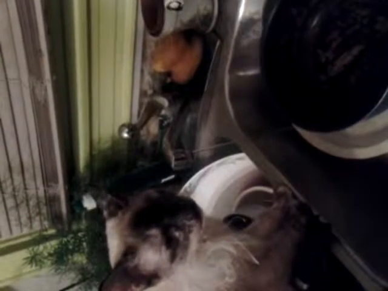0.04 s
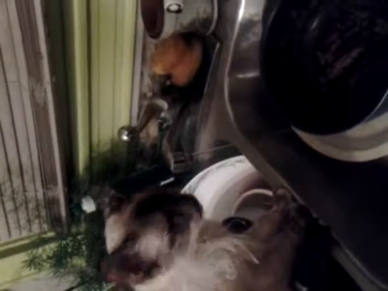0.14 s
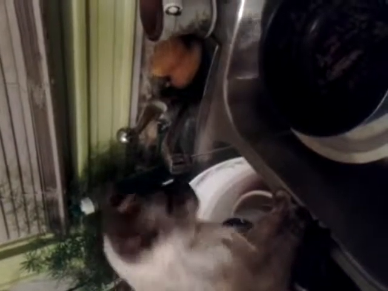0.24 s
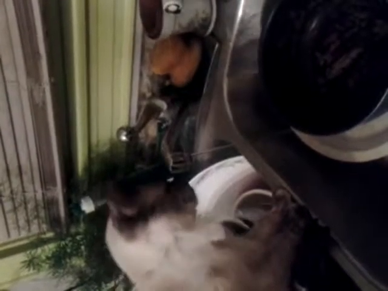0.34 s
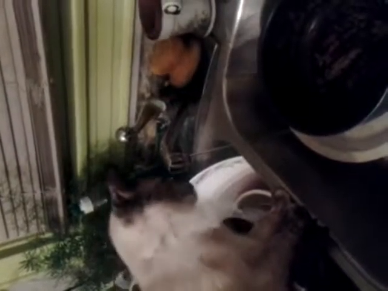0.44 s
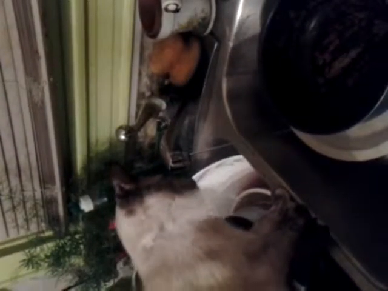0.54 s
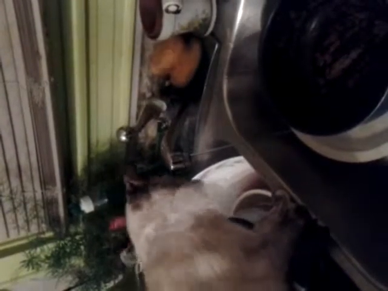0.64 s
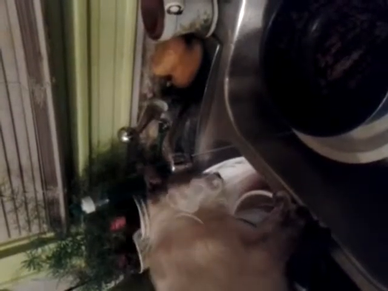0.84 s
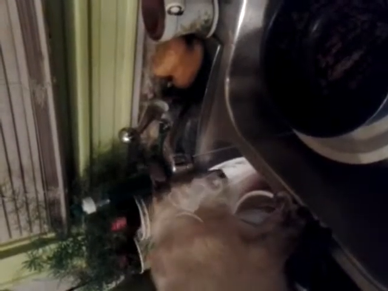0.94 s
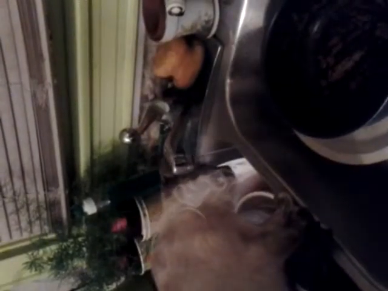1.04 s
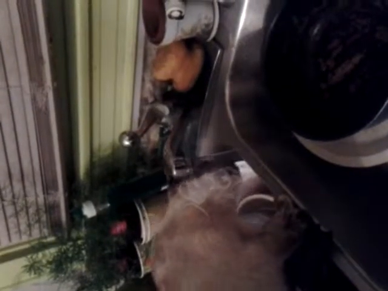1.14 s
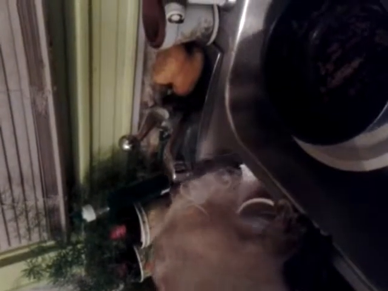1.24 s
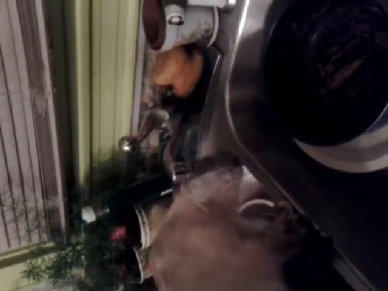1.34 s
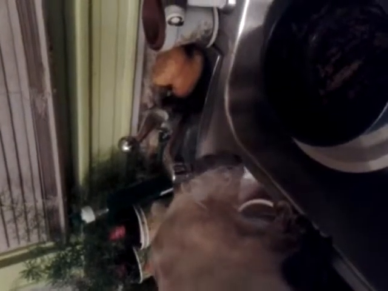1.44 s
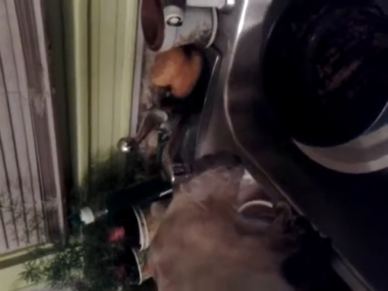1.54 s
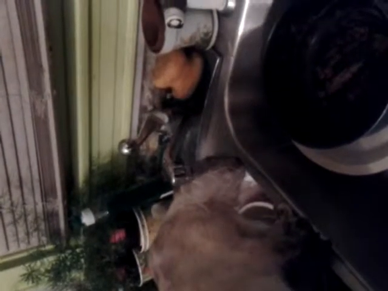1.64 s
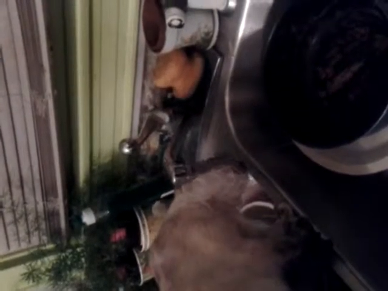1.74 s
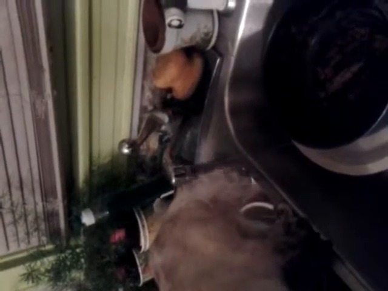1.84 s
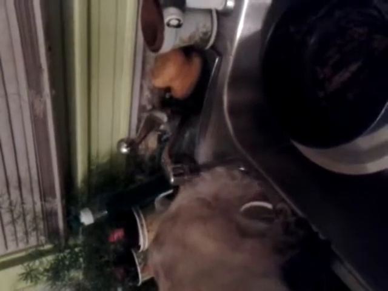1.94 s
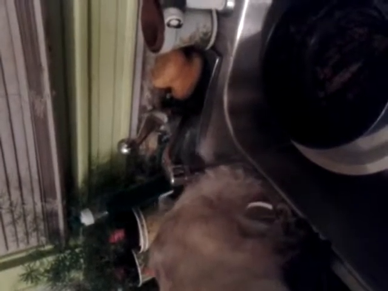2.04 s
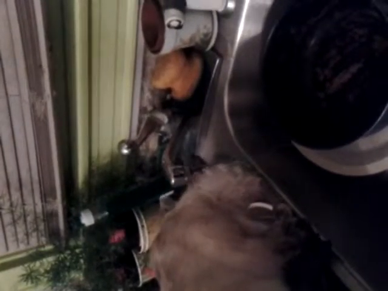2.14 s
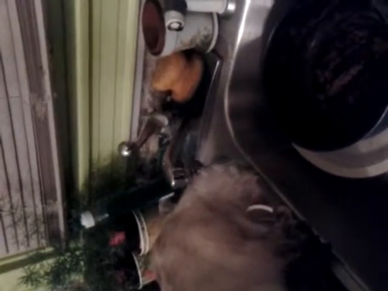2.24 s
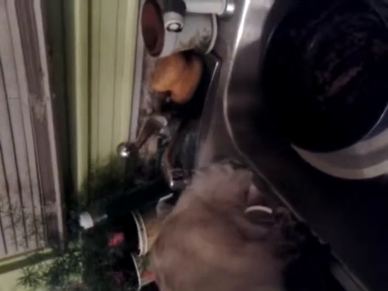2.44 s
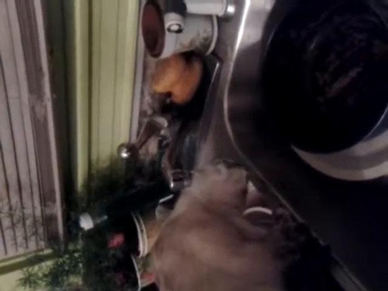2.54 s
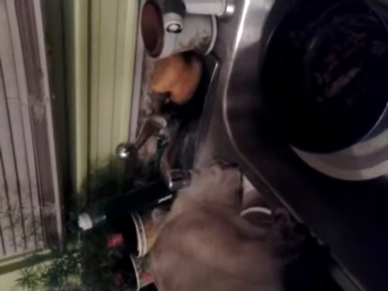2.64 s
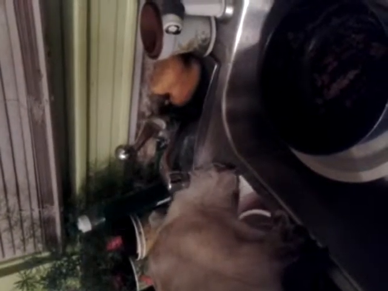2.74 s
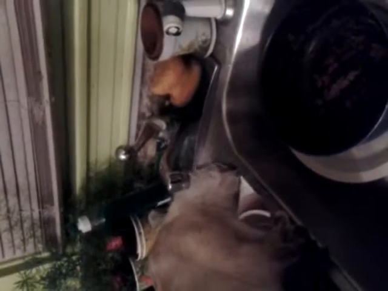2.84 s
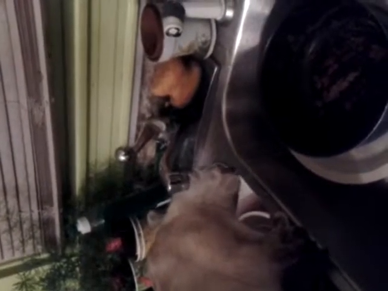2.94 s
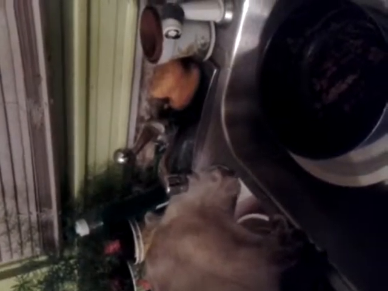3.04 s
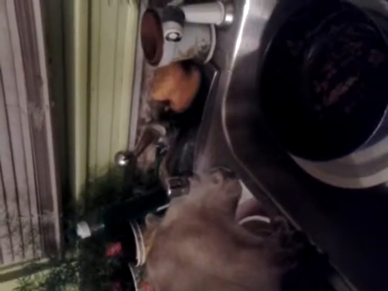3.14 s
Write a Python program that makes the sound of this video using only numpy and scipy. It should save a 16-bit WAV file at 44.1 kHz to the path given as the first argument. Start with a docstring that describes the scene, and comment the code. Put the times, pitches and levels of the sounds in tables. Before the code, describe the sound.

Four dry ticks, then close quiet cat lapping in a steel basin, tiny bubbles snapping sharply, ending on one very loud click.

```python
"""Four dry ticks on the right open the scene while a cat laps water in a steel kitchen sink, close by.
Tiny bubbles snap as short sine rings in noise spray, and bigger bubbles ring lower and uneven.
Each lap is a soft sine gulp with noise churn ringing the air of the basin; filtered drops fizz and swish.
Basin walls and kitchen echo the bubbles by decaying noise, over shaped room rumble, hiss and sine hum."""
import sys
import numpy as np
from scipy import signal
from scipy.fft import rfft, irfft
from scipy.io import wavfile
from scipy.ndimage import uniform_filter1d

SR = 44100
rng = np.random.default_rng(int(sys.argv[2]) if len(sys.argv) > 2 else 0)


def ratio(d):
    """dB to gain"""
    e = np.asarray(d, float) / 20
    return 10 ** e


def master_out(mix):
    """Clip the mix to full scale and print it as 16-bit PCM to the path in sys.argv[1]."""
    frames = np.transpose(np.atleast_2d(mix))
    ceiling = np.clip(frames, -1, 1)
    pcm = np.round(ceiling * 32767).astype(np.int16)
    wavfile.write(sys.argv[1], SR, pcm)


N = 333837

# small snapping bubbles: start_s, level_db (ring peak), pitch_hz (at the start),
# pan_db (left minus right), air_db (spray at 9-14.5 kHz)
SNAP_EVENTS = [(0.0307, -42, 7300, 2, -74.3), (0.7762, -34.5, 7770, 6, -66.0),
               (1.6632, -34, 7580, 6, -52.9), (1.6676, -27.5, 10370, -3, -46),
               (1.7951, -31.5, 7860, 4, -63.4), (1.8, -30.5, 8270, 6, -58.9), (2.2342, -24.1, 7700, 5, -63),
               (2.4289, -38.5, 8480, 4, -66.1), (2.6073, -25.2, 8520, 5, -54),
               (2.8164, -41, 8510, 7, -70.6), (2.8368, -44, 13090, 2, -53),
               (2.9658, -33.5, 6900, -2, -49.1), (3.0573, -24.8, 8480, 3, -37),
               (3.2303, -31.0, 10190, -2, -42), (3.5485, -43.4, 6980, 0, -56.8),
               (3.5557, -39, 7620, 1, -70.7), (3.6493, -23, 7500, 0, -33), (3.6516, -24, 8100, 5, -34),
               (3.6804, -22, 9740, 0, -37), (3.7829, -27.5, 7700, 2, -63.6), (3.8136, -33, 14040, 0, -44),
               (3.8894, -41.5, 7750, 5, -65.5), (3.9379, -44, 7900, 4, -69.2),
               (3.9452, -27.5, 7400, -3, -74.3), (3.9965, -20.5, 7670, 6, -57),
               (4.0043, -34, 9300, -3, -54.1), (4.7813, -36.8, 8760, 8, -63.2),
               (4.7889, -26.5, 7200, 2, -55.4), (4.8997, -34, 7400, -4, -47.4),
               (4.9036, -19, 7950, 5, -50.8), (4.9287, -22, 7900, 13, -51.9),
               (4.9459, -31.8, 5970, -1, -47.9), (4.9725, -38.8, 7560, 3, -61.0),
               (4.9818, -31.5, 7440, 1, -50.8), (5.0232, -43.7, 10210, 2, -62.1),
               (5.4689, -39, 7260, 0, -56.4), (5.6282, -27.5, 7770, 2, -44),
               (5.6636, -33.5, 7650, 4, -48.1), (5.7319, -20.9, 8100, 4, -34),
               (5.8267, -37.4, 7100, 0, -53.5), (5.8425, -33.6, 7150, 3, -59.9),
               (5.8493, -27.5, 7080, 0, -63.2), (5.9837, -35, 13590, 1, -44), (6.0181, -20.5, 7470, 4, -32),
               (6.0894, -27.5, 10400, 0, -38.4), (6.1866, -38, 7340, 2, -58.8),
               (6.2043, -24.5, 8300, 3, -42.2), (6.3646, -27.3, 7000, 0, -54), (6.3711, -17, 8220, 5, -34),
               (6.3809, -29.4, 8650, 2, -57), (6.3975, -32, 13540, 3, -39), (6.4467, -29.5, 9800, 3, -44),
               (6.5122, -24.5, 7600, 8, -49.8), (6.5372, -23, 7560, 3, -39), (6.5642, -36, 7940, 9, -55),
               (6.6365, -27.5, 8140, 3, -32), (6.656, -30, 7520, 3, -57), (6.7335, -26.5, 8180, 5, -44),
               (6.8386, -30.6, 7520, 4, -53.4), (6.8789, -31.5, 7620, 8, -56),
               (6.9178, -34.8, 8420, 6, -53), (6.9404, -26.5, 7100, 1, -51.8),
               (7.095, -33.5, 7390, 3, -59.3), (7.1112, -34, 7080, 3, -45), (7.2266, -15.0, 7720, 0, -58),
               (7.3053, -36, 7410, 2, -61.6), (7.3644, -23, 8420, 5, -48), (7.4138, -38, 8290, 3, -65.5),
               (7.4562, -19.5, 7920, 4, -33), (7.4777, -20.5, 7700, 1, -49),
               (7.5177, -0.8, 7240, -0.5, -36), (7.5467, -27, 7360, -1, -35)]
# faint snaps at random moments: how many chances, typical level and its scatter, typical pitch
FAINT_CHANCES, FAINT_DB, FAINT_SCATTER_DB, FAINT_HZ = 60, -44.5, -0.5, 7600
FAINT_HALF_DB = -56  # fizz level that lets half of the chances sound
# spray near 7 kHz: its level around a -30 dB snap, and the dB it gains for each dB of the snap
SPRAY_DB, SPRAY_GROWTH = -40, 0.72

# larger bubbles: start_s, level_db (before roughening), pitch_hz (at the start), pan_db (left minus right)
BUBBLE_EVENTS = [(0.3681, -47.5, 1382, -3.5), (0.3894, -48.5, 1430, -6), (0.4114, -52, 1426, -1.0),
                 (0.9517, -45.5, 1954, -8), (1.1657, -48, 4730, -3.0), (1.6626, -50, 4340, -2.0),
                 (1.7952, -47.5, 3110, -4), (2.0364, -57, 2120, -3.0), (2.0853, -57, 2380, -4.0),
                 (3.2944, -49, 3340, 2), (3.4494, -59, 2320, -4.0), (3.581, -41, 1637, -2.0),
                 (3.613, -41, 4530, -4), (3.6492, -36, 4600, -3.0), (3.79, -44.5, 1953, -3.0),
                 (3.9956, -42, 5490, 1.0), (4.23, -40, 5270, -4), (4.795, -47.5, 2030, 1),
                 (4.8504, -43, 2280, 4), (4.9458, -27.5, 3970, -0.5), (5.3832, -54, 1384, -6),
                 (5.6863, -35, 3315, -3.0), (5.8472, -25.5, 3440, 0.0), (6.0185, -28, 4750, -4),
                 (6.1874, -49, 1120, -9), (6.281, -42.5, 4600, -6.0), (6.3065, -37, 1354, -5),
                 (6.461, -33, 2875, -6), (6.8389, -33.5, 2240, -3), (7.0917, -35.5, 2550, -4),
                 (7.2399, -40, 5560, -1.5), (7.304, -34.5, 1336, -4), (7.4774, -26.5, 1527, -2.0),
                 (7.4814, -28.5, 1406, -4)]
RING_CYCLES = 10.05  # after its swell, a bubble fades to about a third in this many cycles
BUBBLE_SWELL = 0.55  # share of the ring time
# bubbles that whistle upward as a pocket of air closes:
# start_s, level_db (before roughening), pitch_hz (at the start), length_ms (swell plus fade to a third)
CHIRP_EVENTS = [(6.21, -52, 1196, 33), (6.265, -45.5, 1770, 6.4), (6.293, -41, 1004, 23.4)]
CHIRP_RISE, CHIRP_SWELL = 0.42, 0.59  # octaves per 10 ms, share of the length

# strokes of the tongue: start_s, level_db (relative), pitch_hz (centre), length_ms (nominal)
LAP_EVENTS = [(0.047, -41.5, 974, 28), (0.116, -39, 752, 24), (0.332, -46.5, 726, 30),
              (0.542, -44, 962, 31), (0.794, -42, 740, 27), (0.872, -44.5, 940, 28),
              (0.948, -42.5, 930, 34), (1.173, -46.5, 619, 23), (1.4, -46.5, 748, 28),
              (1.593, -44, 908, 25), (1.695, -40, 748, 22), (1.715, -43, 1007, 19), (1.794, -37.5, 980, 22),
              (2.002, -43.5, 926, 23), (2.057, -40, 766, 21), (2.081, -46, 788, 40),
              (2.231, -46.5, 932, 28), (2.295, -47.5, 754, 24), (2.353, -45, 630, 17),
              (2.572, -46, 780, 28), (2.609, -43, 751, 19), (2.942, -40, 749, 28), (3.038, -50, 635, 31),
              (3.076, -47, 730, 45), (3.112, -44.5, 764, 28), (3.654, -41.5, 647, 28),
              (3.998, -47, 623, 25), (4.038, -35, 938, 26), (4.495, -43.5, 412, 23),
              (4.905, -46.5, 633, 45), (5.058, -44.5, 620, 28), (5.261, -46, 756, 24),
              (5.321, -48.5, 624, 21), (5.474, -43.5, 627, 25), (5.717, -45.5, 735, 36),
              (5.758, -48.5, 727, 49), (5.884, -42, 733, 28), (5.933, -46, 546, 28), (6.049, -47, 760, 19),
              (6.086, -41, 630, 18), (6.17, -41, 748, 37), (6.248, -43.5, 728, 43), (6.366, -38, 739, 37),
              (6.437, -46, 722, 41), (6.659, -41.5, 342, 24), (6.971, -42.5, 715, 28),
              (7.094, -48, 563, 36), (7.363, -41, 857, 29), (7.48, -43.5, 549, 38)]
# low gulps spread through the basin, higher ones come from the right:
# left minus right dB up to 700 Hz, and its change per octave above
LAP_PAN_DB, LAP_PAN_DB_PER_OCTAVE = -3, -8
# resonances of the air in the basin: pitch_hz, width_hz, level_db (relative)
BASIN_MODES = [(356, 9.3, 1), (563.7, 26, 0.5), (626, 34, -3), (748, 19.7, -4.1), (907, 41, -8.5)]

# restless water between the snaps: start_s, level_db (fizz before its flutter)
FIZZ_LEVELS = [(0, -62), (0.9, -74), (1.35, -72), (2.0, -75), (3.4, -65.5), (4.4, -67), (5.3, -78),
               (5.7, -59.5), (6.3, -59), (6.55, -48.5), (6.8, -56.5), (7.2, -56), (7.57, -52)]
# soft sheets of spray without a snap:
# start_s, level_db (high band), fade_ms (to a third), low_db (2.2-5.4 kHz band relative to the high one)
SWISH_EVENTS = [(0.15, -53, 40, -20), (0.64, -56, 50, -14), (1.67, -54.5, 110, -1), (2.1, -61, 44, 0.5),
                (2.42, -52.5, 22, -9), (2.93, -52, 41, -3), (3.24, -48, 28, -12), (3.6, -46.5, 58, -4.5),
                (4.02, -61, 51, 2), (4.494, -46, 22, -8.5), (4.63, -49, 110, -15), (5.45, -58.5, 78, 1),
                (5.675, -58, 20, 12), (6.25, -59, 77, 5.5)]
SWISH_SWELL_MS = 17.3

# echoes: level of each tail, and the time it takes to fall 60 dB
WALL_DB, WALL_T60_S = -6, 0.06
KITCHEN_DB, KITCHEN_T60_S = -12, 0.32

# dry ticks, strongest on the right: first_s, spacing_s, level_db (right), undershoot_ms (fade to a third)
TICK_TRAIN = (0.01455, 0.0651, -23.5, 0.25)

# colour of the room tone: pitch_hz, level_db (relative, per Hz)
ROOM_COLOUR = [(30, -27), (59, -10), (106, -6), (183, -1.5), (368, -1), (476, -4.5), (758, -5.5), (956, -9),
               (1780, -13), (4700, -17), (6000, -20.5), (6800, -10.5), (7300, -10), (8600, -19),
               (10500, -17.5), (14400, -22)]
# stereo lean of the room tone: pitch_hz, pan_db (left minus right)
ROOM_LEAN = [(60, -5), (110, 2.5), (200, -1), (380, -3), (700, -4), (1290, -3), (2380, -2.5), (4400, -2),
             (8120, -2), (15000, -1)]
# how alike the two sides are: pitch_hz, likeness (0-1)
ROOM_LIKENESS = [(60, 0.47), (290, 0.7), (640, 0.53), (1400, 0), (4000, 0.06)]
ROOM_DB, HISS_TOP_HZ = -55, 14700  # rms of the two sides' average before the slow swelling, top of the hiss
# hum partials: pitch_hz, level_db (rms before wavering)
HUM_PARTIALS = [(59.3, -72), (183, -69), (358, -70.5)]


def along(table, hz):
    """Read (Hz, value) points on a log-frequency axis."""
    point_hz, values = np.transpose(table)
    return np.interp(np.log(hz + 1), np.log(point_hz), values)


def band(x, lo_hz, hi_hz):
    """Band-pass, scaled to rms 1."""
    sos = signal.butter(2, [lo_hz, min(hi_hz, SR * .45)], "band", fs=SR, output="sos")
    y = signal.sosfilt(sos, x)
    return y / y.std()


def walk(rate):
    """Random levels held 1 / rate s, then smoothed twice into a wandering curve."""
    hold = int(SR / rate)
    steps = np.repeat(rng.standard_normal(N // hold + 1), hold)
    return 1.3 * uniform_filter1d(uniform_filter1d(steps, hold), hold)[:N]


def add(out, s, sound, pan_db):
    """Mix a short sound in at s seconds, panned by left minus right dB."""
    i = max(int(s * SR), 0)
    n = min(len(sound), N - i)
    out[:, i:i + n] += sound[:n] * ratio(np.array([[pan_db], [-pan_db]]) / 2)


def shape(t, swell_ms, ring_ms):
    """Smooth swell to 1, then exponential decay to about a third every ring_ms."""
    swell, ring = max(swell_ms, .05) / 1000, max(ring_ms, .1) / 1000
    rise = np.sin(np.pi / 2 * np.minimum(t / swell, 1)) ** 2
    return rise * np.exp(-np.maximum(t - swell, 0) / ring)


def bubble(hz, swell_ms, ring_ms, rise):
    """A ringing bubble; its pitch climbs rise octaves per 10 ms as it nears the surface."""
    t = np.arange(int(SR * .08)) / SR
    pitch = np.minimum(hz * 2 ** (rise * t * 100), SR * .4)
    return shape(t, swell_ms, ring_ms) * np.sin(2 * np.pi * np.cumsum(pitch) / SR)


def snaps():
    """Each snap is a few cycles of a tiny bubble with a ragged burst of spray around it."""
    rings, near, air = np.zeros((3, 2, N))
    t = np.arange(int(SR * .05)) / SR
    for s, db, hz, pan_db, air_db in list(SNAP_EVENTS) + faint_snaps():
        near_db = SPRAY_DB + SPRAY_GROWTH * (db + 30)
        add(rings, s, ratio(db) * bubble(hz, 0.83, 0.55, 0.06), pan_db)
        add(near, s, ratio(near_db) * shape(t, 0.9, 4.46), pan_db)
        add(air, s, ratio(air_db) * shape(t, 0.8, 4.0), 0.27 * pan_db)
    shared, apart = rng.standard_normal(N), rng.standard_normal((2, N))
    spray = (shared + 0.8 * apart) * ratio(1.5 * walk(400))  # fast flutter makes it ragged
    return rings + near * band(spray, 6500, 9300) + air * band(spray, 9000, 14500)


def faint_snaps():
    """Random extra snaps, as rows of SNAP_EVENTS; restless water lets more of them through."""
    s, db = np.transpose(FIZZ_LEVELS)
    even, bell = rng.random((FAINT_CHANCES, 2)), rng.standard_normal((FAINT_CHANCES, 4))
    start_s = even[:, 0] * N / SR
    sounds = even[:, 1] < 1 / (1 + ratio(FAINT_HALF_DB - np.interp(start_s, s, db)))
    level_db = FAINT_DB + FAINT_SCATTER_DB * bell[:, 0]
    pitch_hz = FAINT_HZ * (1 + 0.07 * bell[:, 1])
    pan_db = 3 + 4 * bell[:, 2]
    air_db = -62 + 4 * bell[:, 3]
    return list(np.c_[start_s, level_db, pitch_hz, pan_db, air_db][sounds])


def bubbles():
    """Lower bubbles trapped by the tongue; broken water makes their ring uneven, the small ones most."""
    rings, splash = np.zeros((2, 2, N))
    for s, db, hz, pan_db in BUBBLE_EVENTS:
        ring_ms = RING_CYCLES / hz * 1000
        swell_ms = BUBBLE_SWELL * ring_ms
        roughness = 0.15 + hz / 14000
        add(rings, s, ratio(db) * bubble(hz, swell_ms, ring_ms, 0.013), pan_db)
        add(splash, s, ratio(db) * roughness * bubble(hz, swell_ms, 2 * ring_ms, 0), pan_db)
    for s, db, hz, ms in CHIRP_EVENTS:
        chirp = bubble(hz, CHIRP_SWELL * ms, (1 - CHIRP_SWELL) * ms, CHIRP_RISE)
        add(rings, s, ratio(db) * chirp, -3)
    slow = band(rng.standard_normal(N), 80, 400)
    quick = band(rng.standard_normal(N), 150, 700)
    return rings * (1 + 0.35 * slow) + splash * quick


def lap_pan(hz):
    """Left minus right dB of a gulp: the higher it is above 700 Hz, the further right."""
    return LAP_PAN_DB + LAP_PAN_DB_PER_OCTAVE * max(np.log2(hz / 700), 0)


def laps():
    """A soft gulp of water, and its churn ringing the basin modes that lie near the gulp's own pitch."""
    out, t = np.zeros((2, N)), np.arange(int(SR * .12)) / SR
    for s, db, hz, ms in LAP_EVENTS:
        add(out, s, ratio(db - 7.5) * bubble(hz, 0.25 * ms, 0.62 * ms, 0), lap_pan(hz))
    churn = rng.standard_normal(N) + 0.67 * rng.standard_normal((2, N))
    for mode_hz, width_hz, mode_db in BASIN_MODES:
        strength = np.zeros((2, N))
        for s, db, hz, ms in LAP_EVENTS:
            reach = np.exp(-(np.log(mode_hz / hz) / 0.27) ** 2)  # near pitches drive the mode hardest
            add(strength, s, ratio(db - 7.0) * reach * shape(t, 0.14 * ms, 0.91 * ms), lap_pan(hz))
        b, a = signal.iirpeak(mode_hz, mode_hz / width_hz, SR)
        ringing = signal.lfilter(b, a, strength * churn)
        out += ratio(mode_db) * ringing * np.sqrt(SR / np.pi / width_hz)  # make up for the narrow band
    return out


def fizz():
    """Fine droplets of uneven size: a bed that follows the stirring, and swishes that also reach lower."""
    s, db = np.transpose(FIZZ_LEVELS)
    high, low = np.zeros((2, 2, N))
    high += ratio(np.interp(np.arange(N) / SR, s, db) + 5.6 * walk(27))
    t = np.arange(int(SR * .4)) / SR
    for s, db, fade_ms, low_db in SWISH_EVENTS:
        swish = shape(t, SWISH_SWELL_MS, fade_ms)
        add(high, s, ratio(db) * swish, 1.5)
        add(low, s, ratio(db + low_db) * swish, -2.5)
    present = rng.random((2, N)) < 0.1
    size = ratio(2 * rng.exponential(size=(2, N)))
    drops = present * size * rng.standard_normal((2, N))
    return high * band(drops, 6640, 8660) + low * band(drops, 2200, 5400)


def echo(x):
    """Dense quick echoes off the basin walls, and the longer tail of the kitchen; each ear gets its own."""
    t = np.arange(int(SR * .5)) / SR
    out = x.copy()
    # gap: seconds over which the tail builds up
    for db, t60, gap in ((WALL_DB, WALL_T60_S, 0.0015), (KITCHEN_DB, KITCHEN_T60_S, 0.008)):
        decay = np.exp(-np.log(1000) * t / t60)
        tail = rng.standard_normal((2, len(t))) * decay * np.minimum(t / gap, 1) ** 2
        tail = band(tail, 180, 10300)  # the walls soak up the top
        tail *= ratio(db) / np.sqrt((tail ** 2).sum(axis=1, keepdims=True))
        out += signal.fftconvolve(x.mean(axis=0, keepdims=True), tail, axes=1)[:, :N]
    return out


def ticks():
    """Four evenly spaced spikes, each with a slower undershoot, far fainter on the left."""
    first_s, spacing_s, db, under_ms = TICK_TRAIN
    t = np.arange(64) / SR
    undershoot = -0.55 * np.exp(-(t - 1.2e-4) * 1000 / under_ms)
    spike = np.where(t < 1.2e-4, 1, undershoot)
    out = np.zeros((2, N))
    for s in first_s + spacing_s * np.arange(4):
        add(out, s, ratio(db) * spike, 0)
    return out * ratio(np.array([[-18.0], [0]]))


def room():
    """Rumble largely shared by both sides, microphone hiss that is not, both swelling; the hum wavers."""
    hz = np.fft.rfftfreq(N, 1 / SR)
    alike = np.clip(along(ROOM_LIKENESS, hz), 0, 1)
    mid, side = rfft(rng.standard_normal((2, N)), axis=1)
    sign = np.array([[1], [-1]])  # left, right
    pair = np.sqrt(1 + alike) * mid + sign * np.sqrt(1 - alike) * side
    pair *= ratio(along(ROOM_COLOUR, hz) + sign * along(ROOM_LEAN, hz) / 2)
    pair *= 1 / (1 + (hz / HISS_TOP_HZ) ** 120)
    low = 1 / (1 + (hz / 1000.) ** 4)  # splits rumble from hiss
    scale = ratio(ROOM_DB) / irfft(pair, N).mean(axis=0).std()
    rumble = irfft(pair * low, N) * ratio(0.7 * walk(6))
    hiss = irfft(pair * (1 - low), N) * ratio(1.2 * walk(3))
    t = np.arange(N) / SR
    hum = np.zeros(N)
    for partial_hz, db in HUM_PARTIALS:
        level = np.sqrt(2) * ratio(db + 2.4 * walk(13))
        hum += level * np.sin(2 * np.pi * partial_hz * t + 1.92 * walk(12))
    return scale * (rumble + hiss) + hum


def scene():
    """Echoing bubbles, laps and fizz below 14.9 kHz, over the room and the ticks."""
    water = echo(snaps() + bubbles()) + laps() + fizz()
    water = signal.sosfilt(signal.ellip(8, .2, 50, 14900, fs=SR, output="sos"), water)
    return water + room() + ticks()


def top_cut(x):
    """Nothing passes above the cut-off."""
    return signal.sosfilt(signal.butter(12, 15800, fs=SR, output="sos"), x)


def record(dry):
    """Peaks beyond full scale are clipped flat."""
    mix = np.clip(dry, -1, 1)
    return top_cut(mix)


dry = scene()
out = record(dry)
master_out(out)
```